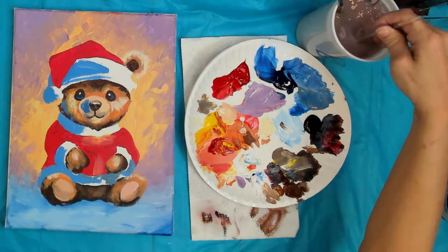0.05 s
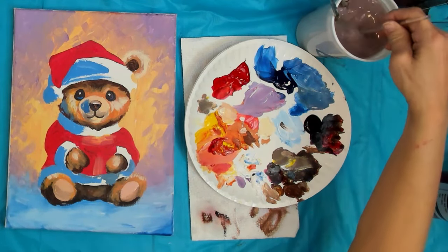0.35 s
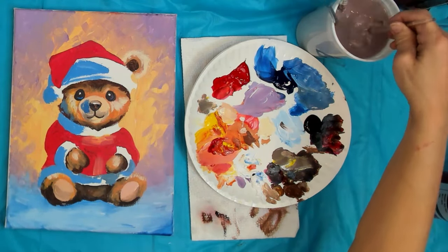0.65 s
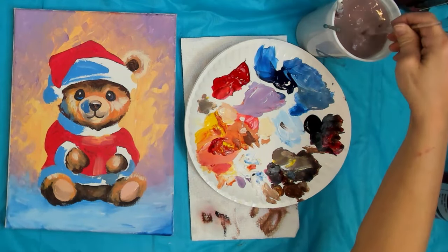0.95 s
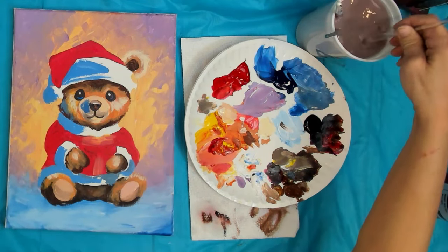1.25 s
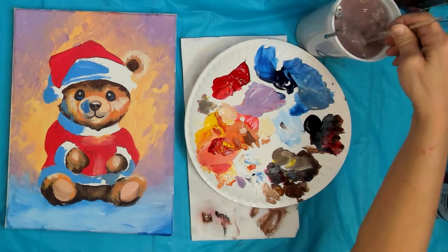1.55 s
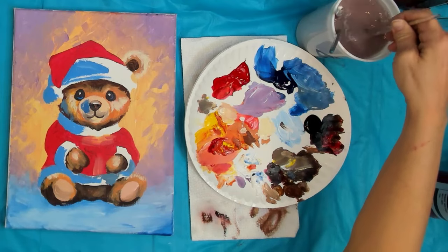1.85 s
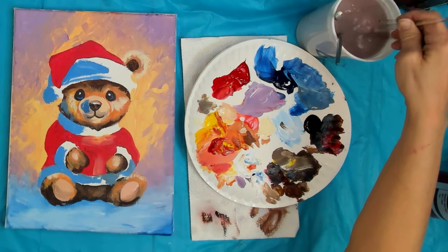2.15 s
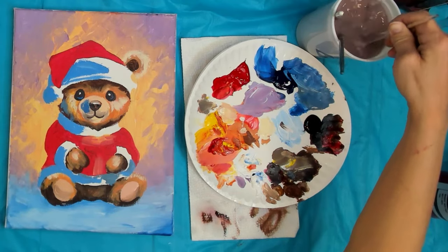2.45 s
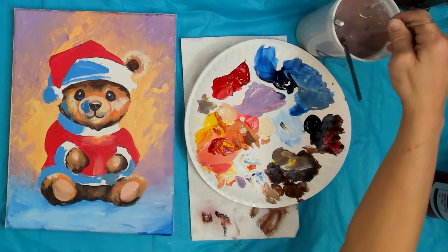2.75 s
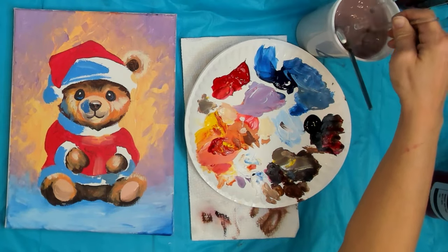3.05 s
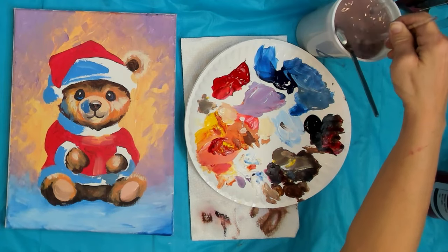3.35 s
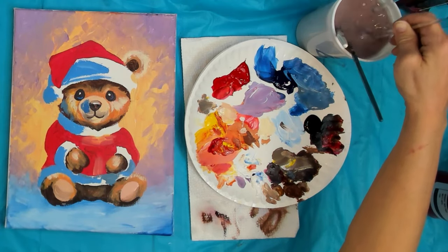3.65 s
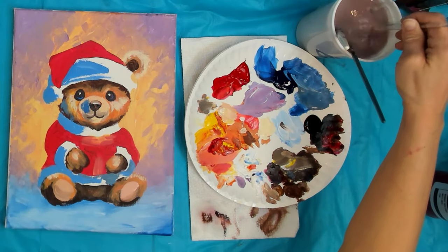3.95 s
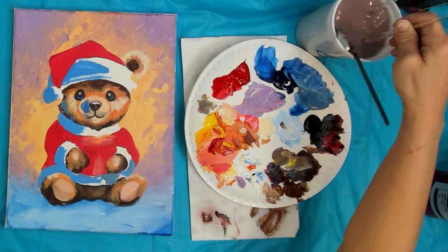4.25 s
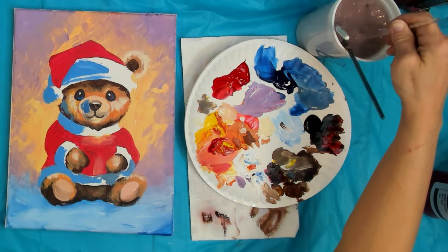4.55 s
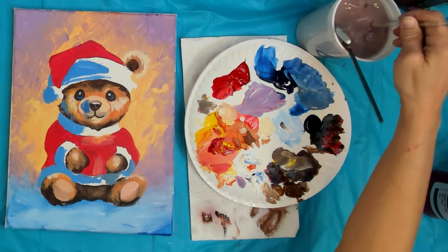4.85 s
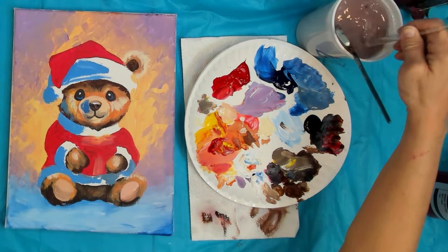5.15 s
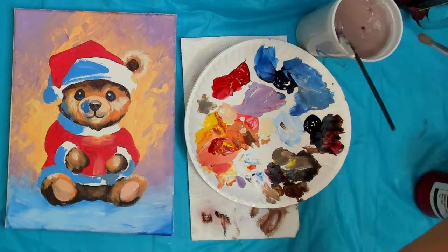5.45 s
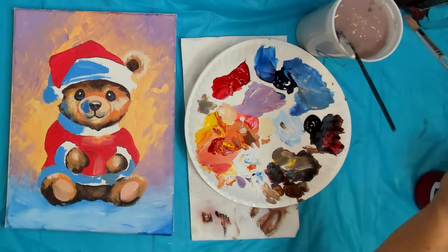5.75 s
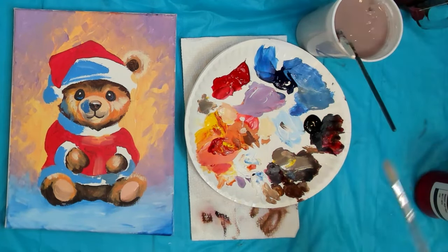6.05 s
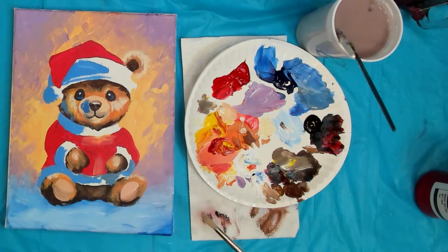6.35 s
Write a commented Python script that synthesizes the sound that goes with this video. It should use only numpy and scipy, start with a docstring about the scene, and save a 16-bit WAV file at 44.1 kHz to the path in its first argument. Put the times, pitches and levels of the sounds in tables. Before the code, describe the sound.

Over a low hum in a small room, water sloshes and fizzes softly as a paintbrush is rinsed in a plastic cup. Sharp little taps and clinks come several times a second, mixed with dull bumps of the cup on the table and one brief glassy ring. Toward the end a few short plops sound, the stirring stops, and a hand makes a quick hissing scuff.

```python
"""Rinsing a paintbrush

A brush is swished in a plastic cup of water on a table in a small room. Its metal band and handle tap and
chatter on the wall, and its bristles push the cup against the table with dull thumps. The water sloshes and
crackles, touches of the brush make the air in the cup plop, and one knock sets a hard object nearby ringing. At
the end the hand brushes past something. Mains hum lies underneath."""
import sys
import numpy as np
from scipy import signal
from scipy.fft import rfft, irfft, next_fast_len
from scipy.io import wavfile
from scipy.ndimage import map_coordinates

SR = 44100
rng = np.random.default_rng(int(sys.argv[2]) if len(sys.argv) > 2 else 0)


def transcribe(u):
    """Save the signal u as a 16-bit wav file named by the first command-line argument.

    u: samples, shape (n,) or (channels, n), limited to [-1, 1]; the rate is SR.
    q: integer samples, one column per channel.
    """
    v = np.clip(np.atleast_2d(u).T, -1, 1)
    q = np.round(v * 32767).astype(np.int16)
    wavfile.write(sys.argv[1], SR, q)


N = 285768

# The brush knocks on the cup wall:
# start_s, level_db, brightness_db_per_octave, mid_boost_db, bounce_after_s, bounce_db
KNOCKS = [(0.0274, -54, -0.5, 4, 0.034, -5.5), (0.062, -63, 0.5, -1, 0.02, -13),
          (0.093, -35, 2.5, -6, 0.013, -5.5), (0.2634, -48, -2.0, 0.5, 0.021, -8),
          (0.4121, -55, -3.5, 4, 0.012, -22), (0.565, -41.5, 0.5, 1.5, 0.014, -12),
          (0.8487, -45.5, -1.5, 7.5, 0.014, -27), (0.9126, -48, 0.5, -0.5, 0.021, -28),
          (0.9871, -50, -1.5, 7.5, 0.012, -31), (1.0771, -45.5, 0.5, 2.5, 0.01, -29),
          (1.154, -49, -1, 6.5, 0.025, -30), (1.2487, -41.5, 1.5, -4.5, 0.011, -24),
          (1.3069, -48.5, 2, 12, 0.0065, -6), (1.3204, -44, -0.1, 4.5, 0.012, -12),
          (1.5669, -42.5, 0.5, 2, 0.0129, -8), (1.7547, -46, -0.1, 0.5, 0.0079, -3),
          (1.851, -51.5, -2, 8.5, 0.01, -19), (1.9358, -39.5, 1, 2.5, 0.0091, -20),
          (2.1199, -43, 3, 3, 0.012, -20), (2.2926, -38, 2, 2.5, 0.0093, -9),
          (2.3928, -57.5, -2.4, 4, 0.018, -4), (2.4835, -40.5, 3, 3.5, 0.0065, -8.5),
          (2.6573, -42.5, 2, 3, 0.0077, -0.5), (2.8382, -49, 0.5, 6.5, 0.021, -12),
          (3.0034, -47, 1, 2.5, 0.012, -0.5), (3.1909, -43.5, 4.5, -2.5, 0.015, -33),
          (3.3813, -46.5, 3.5, 4, 0.0097, -29), (3.456, -57.5, -1, 2.5, 0.0271, -8),
          (3.5631, -45, 5, 2, 0.012, -34), (3.7283, -45.5, 0.7, 2, 0.0076, -10),
          (3.8989, -45, 3, 2, 0.0151, -9), (4.096, -45.5, 1.2, 5, 0.015, -19),
          (4.2493, -51, 1.3, 8.5, 0.011, -5.5), (4.2679, -51, 2.5, -5, 0.011, -27),
          (4.401, -53.5, -1.5, 7, 0.014, 4), (4.417, -57.5, 1.2, 7, 0.011, -2),
          (4.441, -48.5, 0.9, 0, 0.012, -18), (4.4665, -51, 1, 1.5, 0.02, -8.5),
          (4.5878, -53.5, 1.3, 8, 0.012, -26), (4.6111, -50.5, -0.2, 3.5, 0.012, -24),
          (4.7734, -47, 0.6, 3.5, 0.011, -1.5), (4.795, -47.5, 3, -5, 0.012, -34),
          (4.9562, -50, 0.8, 6, 0.0079, -6), (4.9761, -48.5, -0.5, 4.5, 0.01, -3.5),
          (5.2164, -60, -3, 3.5, 0.012, -6)]
# The cup is pushed against the table, then the brush ticks on its wall:
# start_s, level_db, rise_s, tick_after_s, tick_db
PUSHES = [(0.027, -35.5, 0.0034, .03, -63), (0.468, -36, 0.0044, .02, -85),
          (0.66, -45, 0.054, 0.015, -61.5), (0.801, -43.5, 0.015, 0.026, -70),
          (0.852, -36, 0.0025, 0.011, -67), (0.986, -37, 0.0032, 0.022, -77),
          (1.154, -38, 0.0032, 0.019, -75), (1.323, -35, 0.0026, 0.019, -57.5),
          (1.623, -50, 0.053, 0.021, -72), (1.69, -44.5, 0.009, 0.0047, -71.5),
          (1.852, -36, 0.0016, 0.015, -65), (2.027, -45.5, 0.029, 0.0031, -62.5),
          (2.205, -46, 0.0058, 0.02, -62), (2.388, -40.5, 0.0054, 0.021, -71),
          (2.588, -45.5, 0.04, .015, -68), (2.911, -39.5, 0.0098, .0202, -61),
          (3.271, -44, 0.012, 0.014, -62.5), (3.456, -40, 0.0077, 0.029, -59.5),
          (3.988, -39.5, 0.0098, 0.018, -62.5), (4.169, -50, 0.027, .02, -66),
          (4.361, -49.5, 0.014, 0.014, -68.5), (4.846, -53, 0.0049, 0.018, -67),
          (5.588, -49, 0.0016, 0.0018, -64.5)]
# How loud the stirring is: time_s, slosh_db, bristle_db
STIRRING = [(0.0, -46.5, -52), (0.26, -56, -59.5), (0.67, -56, -62.5), (1.19, -59, -66), (1.35, -64, -69),
            (1.53, -60, -59.5), (1.85, -57.5, -66.5), (2.51, -57.5, -64), (2.68, -61.5, -74),
            (2.88, -56, -65.5), (3.02, -66.5, -65), (3.28, -63, -74), (3.45, -57.5, -64), (3.92, -62, -71),
            (4.5, -62, -64), (5.06, -62, -70.5), (5.5, -69.5, -89)]


def amp(db):
    """Turn decibels into a gain."""
    return 10 ** (np.asarray(db) / 20)


def unit(x):
    """Scale a sound to an average (rms) level of 1."""
    return x / np.sqrt(np.mean(x ** 2) + 1e-20)


def fade(t, fade_s):
    """Die away by 60 dB in fade_s."""
    return 1000. ** (-t / fade_s)


def along(points, hz):
    """Read between (pitch_hz, value) points on a log pitch scale."""
    pitches, values = np.transpose(points)
    return np.interp(np.log(hz + 1), np.log(pitches + 1), values)


def curves(rows):
    """One value per sample for each column after the time."""
    times, *columns = np.transpose(rows)
    return [np.interp(np.arange(N) / SR, times, column) for column in columns]


def wobble(rate):
    """A smooth curve through rate random values a second."""
    return map_coordinates(rng.standard_normal(int(N * rate / SR) + 4), [np.arange(N) * rate / SR])


def after(events, lag_s, width_s):
    """A bump between 0 and 1, lag_s after each event, higher for harder ones."""
    times, db = np.transpose(events)[:2, :, None]
    t = np.linspace(0, N / SR, N // 100)
    bumps = np.sum(amp(db) * np.exp(-((t - times - lag_s) / width_s) ** 2), axis=0)
    return np.interp(np.arange(N) / SR, t, np.sqrt(bumps / bumps.max()))


def add(track, start_s, sound):
    """Mix a sound into the track."""
    i = max(0, round(start_s * SR))
    track[i:i + len(sound)] += sound[:len(track) - i]


def band(x, low_hz, high_hz):
    """Keep only the sound between two pitches."""
    return signal.sosfilt(signal.butter(4, [low_hz, high_hz], btype="band", fs=SR, output="sos"), x)


def colour(x, points):
    """Shape a sound's tone with (pitch_hz, gain_db) points."""
    size = 2 * next_fast_len(len(x))
    cepstrum = irfft(np.log(amp(along(points, np.fft.rfftfreq(size, 1 / SR)))))
    # fold the filter so that it never sounds ahead of its input
    cepstrum[1:size // 2] *= 2
    cepstrum[size // 2 + 1:] = 0
    return irfft(rfft(x, size) * np.exp(rfft(cepstrum)))[:len(x)]


def noise(tone):
    """Steady noise with the given tone."""
    return unit(colour(rng.standard_normal(N), tone))


def room(x, echo_db, fade_s, build_s=0.0034):
    """The small room adds a 0.2 s tail of echoes to each row of sound."""
    t = np.arange(SR // 5) / SR
    shape = fade(t, fade_s) * (1 - np.exp(-(t / build_s) ** 2))
    tail = rng.standard_normal(x.shape[:-1] + t.shape) * shape / np.linalg.norm(shape)
    return x + amp(echo_db) * signal.fftconvolve(x, tail, axes=-1)[..., :x.shape[-1]]


def background():
    """Room air, mains hum and the rumble of the table shaking under the arm."""
    # The hum's tones: pitch_hz, level_db
    hum_tones = [(59.2, -68), (118.4, -65), (183.0, -85), (242.2, -76), (360.7, -69.5)]
    # How hard the table shakes: time_s, level_db
    shaking = [(0.0, -74), (0.27, -61), (2.22, -59), (3.14, -63.5), (4.66, -60), (5.05, -68.5), (5.96, -66),
               (6.03, -91), (6.48, -83)]
    # Tone of the room air: pitch_hz, gain_db
    air_tone = [(18, -59), (26, -33), (35, -14), (60, 1), (110, -4.5), (200, -7.5), (330, -8.5),
                (450, -15.5), (1000, -18.5), (3000, -24), (15000, -27.5)]
    t = np.arange(N) / SR
    hum = 0
    for hz, db in hum_tones:
        level = amp(db - 5.5 + 1.2 * wobble(1.73)) * np.sqrt(2)
        hum += level * np.sin(2 * np.pi * (hz * t + rng.random()))
    rumble = noise([(15, -73), (28, -46), (33, -7), (36, -11), (42, -12.5), (70, -18), (200, -58),
                    (1000, -120)])
    return amp(-63.0) * noise(air_tone) + hum + amp(curves(shaking)[0] + 1.5) * rumble


def bubbles(count, hz, spread, cycles, glide, size_db):
    """Bubbles ring at random times, each a fading tone that rises in pitch."""
    when, strength, pick = rng.random((count, 3)).T[:, :, None]
    pitch = hz * np.exp(spread * (2 * pick - 1))
    samples = np.arange(int(2 * cycles / hz * SR))
    turns = pitch * samples / SR
    size = amp(size_db * strength) / np.sqrt(pitch)
    tones = np.sin(2 * np.pi * turns * (1 + glide * turns / cycles))
    rings = size * tones * fade(turns, cycles) * (1 - np.exp(-turns))
    places = (when * N).astype(int) + samples
    return unit(np.bincount(places.ravel(), rings.ravel(), N)[:N])


def water(surge_db=6, lull_db=8, push_db=4, grit_db=5.5):
    """Stirring folds air into the water: gurgles on a soft wash, while wet bristles scrub and fizz."""
    # Tone of the sloshing: pitch_hz, gain_db
    slosh_tone = [(60, -38.5), (100, 6.5), (140, 17.5), (220, -6), (300, 3), (450, 2), (800, -9),
                  (1300, -21), (2500, -17), (6000, -69)]
    # Tone of the scrubbing: pitch_hz, gain_db
    bristle_tone = [(400, -17), (1200, 3), (1600, -10), (3000, 7.5), (4500, -5.5), (7000, -5.5),
                    (11000, -10), (16000, -29)]
    slosh_db, bristle_db = curves(STIRRING)
    wash = amp(3.5 + 0.81 * wobble(22.16)) * noise(slosh_tone)
    gurgle = amp(-6) * bubbles(count=700, hz=558, spread=0.685, cycles=59, glide=0.034, size_db=29)
    slosh = amp(slosh_db - 3.5) * (wash + gurgle)
    grit = rng.standard_normal(N) * amp(grit_db * wobble(260) + 0.62 * wobble(4.97))
    fizz = bubbles(count=1000, hz=2990, spread=0.79, cycles=11, glide=0.022, size_db=20)
    scrub = amp(bristle_db - 5.5) * (unit(colour(grit, bristle_tone)) + amp(-6) * fizz)
    # the brush slows near the wall, then drives the water back; a push on the cup stirs it too
    stroke_db = -lull_db * after(KNOCKS, lag_s=-0.01, width_s=0.011)
    stroke_db += surge_db * after(KNOCKS, lag_s=0.072, width_s=0.042)
    stroke_db += push_db * after(PUSHES, lag_s=0.0083, width_s=0.01)
    settle = np.interp(np.arange(N) / SR, [5.3, 5.8], [1, 0])  # the water calms once the brush is out
    return settle * amp(stroke_db) * room(slosh + scrub, echo_db=-8.0, fade_s=0.092)


def thumps(soft_hz=350, sharp_rise_s=0.004):
    """The cup bounces on the table; a slow push wakes mostly its lowest tones."""
    # Tones of the filled cup on the table: pitch_hz, fade_s, level_db
    cup_tones = [(107.3, 0.23, -12), (138, 0.23, 2), (159.5, 0.14, -12), (207.6, 0.23, -15),
                 (296.1, 0.35, -16), (400, 0.19, -7), (497, 0.056, -1.5), (842, 0.13, -30)]
    out, t = np.zeros(N), np.arange(SR // 2) / SR
    hz, fade_s, db = np.transpose(cup_tones)[:, :, None]
    for start_s, level_db, rise_s, _, _ in PUSHES:
        strength, shift, phase = rng.standard_normal((3, len(cup_tones), 1))
        softness = 1 + (hz / soft_hz) ** 2 * (1 - np.exp(-rise_s / sharp_rise_s)) / 2
        waves = np.sin(2 * np.pi * (hz * (1 + 0.02 * shift) * t + phase))
        tones = amp(db + 2 * strength) / softness * fade(t, fade_s) * waves
        thump = room(tones.sum(axis=0) * (1 - np.exp(-t / rise_s)), echo_db=-17.0, fade_s=0.99)
        add(out, start_s, amp(level_db) * thump / abs(thump).max())
    return amp(3.5) * out


def contacts(tick_gap_s=0.023, stray_count=18, stray_until_s=5):
    """Every touch on the wall: start_s, level_db, brightness_db_per_octave, mid_boost_db."""
    rows = []
    for start_s, db, brightness, mid_db, flight_s, bounce_db in KNOCKS:
        # two slightly brighter bounces; the second comes sooner and weaker
        rows += [(start_s, db, brightness, mid_db),
                 (start_s + flight_s, db + bounce_db, brightness + 0.7, mid_db),
                 (start_s + 1.85 * flight_s, db + bounce_db - 11, brightness + 0.7, mid_db)]
    dull = (-1.5, 2.5)  # brightness and mid boost of every tick
    for (start_s, _, _, delay_s, db), late in zip(PUSHES, rng.uniform(-1.1, 1, len(PUSHES))):
        tick_s = start_s + delay_s
        rows += [(tick_s, db, *dull), (tick_s + tick_gap_s * (1 + .15 * late), db - 2.5, *dull)]
    # chance touches follow the loudness of the scrubbing
    times, _, bristle_db = np.transpose(STIRRING)
    for when, weak in rng.random((stray_count, 2)):
        tick_s = stray_until_s * when
        rows.append((tick_s, np.interp(tick_s, times, bristle_db) - 5 * weak, *dull))
    return np.array(rows)


def taps(scatter_db=5.0, detune=0.016, mid_hz=2320, mid_octaves=1.09):
    """Each touch makes the wall crack and ring; hard metal hits are bright, cushioned ones dull."""
    # Tones of the cup wall: pitch_hz, width_hz (wider dies sooner), level_db
    wall_tones = [(418, 23, -3), (503, 71, -4.5), (580, 110, -15), (828, 33, -14), (984.4, 23, -6),
                  (1073, 66, -3), (1193, 73, -1.5), (1644, 71, -8), (2094, 123, 6.5), (2430, 84, 9.5),
                  (2720, 190, 2), (3324, 63, 8.5), (4330, 220, 1), (4492, 128, 8.5), (5610, 64, 3),
                  (5300, 260, -4), (6030, 42, -2.5), (6966, 70, -3), (7030, 130, -26), (8400, 140, -7),
                  (8930, 160, -14), (9210, 130, -11.5), (10060, 107, -5.5), (11500, 360, -8),
                  (12140, 58, -9.5)]
    # Borders of five pitch bands, low to high: pitch_hz
    edges = [300, 800, 1700, 3800, 7500, 15500]
    # How the wall answers in each band: swell_s, crack_fade_s, crack_db, echo_db, trim_db
    wall_bands = [(0.0031, 0.077, -3.5, -2.5, 1), (0.0038, 0.052, -8.5, -5.5, -1),
                  (0.00095, 0.037, 1.5, -12.5, -0.5), (0.000067, 0.027, -5.5, -12.5, 1.5),
                  (0.000066, 0.0064, -3.5, -18.5, -1)]
    # How fast the room's echo dies: pitch_hz, fade_s
    echo_fades = [(150, 0.34), (800, 0.17), (2500, 0.19), (7000, 0.16), (14000, 0.21)]
    # How well the cup passes sound to the air: pitch_hz, gain_db
    cup_to_air = [(300, -1), (400, -1), (700, 0), (1000, -1), (1250, 0), (1450, -1), (1750, -3), (2000, -1),
                  (9000, 1), (11000, 0.5), (13000, -5), (16000, -8)]
    out, t = np.zeros(N), np.arange(SR // 7) / SR
    times, strength_db, brightness, mid_db = contacts().T
    hz, width, db = np.transpose(wall_tones)[:, :, None]
    decay = width * np.exp(-np.pi * width * t)
    rings = []
    for strength, shift, phase in rng.standard_normal((len(times), 3, len(wall_tones), 1)):
        # moving water loads the wall, so its tones shift a little from tap to tap
        waves = np.sin(2 * np.pi * (hz * (1 + detune * shift) * t + phase))
        rings.append(unit(np.sum(amp(db + scatter_db * strength) * decay * waves, axis=0)))
    blows = 0
    for low, high, (swell_s, fade_s, crack_db, echo_db, trim_db) in zip(edges, edges[1:], wall_bands):
        centre_hz = np.sqrt(low * high)
        octaves = np.log2(centre_hz / mid_hz)
        level_db = strength_db + brightness * octaves + mid_db * np.exp(-(octaves / mid_octaves) ** 2)
        ring = unit(band(np.array(rings), low, high))
        crack = unit(band(rng.standard_normal(ring.shape) * fade(t, fade_s), low, high))
        # slow bending waves take a few milliseconds to set the whole wall moving
        blow = (ring + amp(crack_db) * crack) * (1 - np.exp(-(t / swell_s) ** 2))
        blow = room(blow, echo_db, along(echo_fades, centre_hz))
        opening_level = np.sqrt(np.mean(blow[:, t < .012] ** 2, axis=1))
        blows += blow * (amp(level_db + trim_db) / opening_level)[:, None]
    for start_s, blow in zip(times, blows):
        add(out, start_s, blow)
    return colour(out, cup_to_air)


def clinks():
    """Struck near its free end, the brush handle bends and rings with three close tones."""
    # Hits on the handle: start_s, level_db
    hits = [(1.249, -28.5), (2.2925, -30), (4.416, -31)]
    # The handle's tones: pitch_hz, level_db, fade_s
    handle_tones = [(2150, -1, 0.036), (2310, -4, 0.052), (2470, 7, 0.014)]
    out, t = np.zeros(N), np.arange(SR // 4) / SR
    for start_s, level_db in hits:
        ring = sum(amp(db) * fade(t, fade_s) * np.sin(2 * np.pi * (hz * t + rng.random()))
                   for hz, db, fade_s in handle_tones)
        add(out, start_s, amp(level_db) * ring / abs(ring).max())
    return room(out, echo_db=-7, fade_s=0.23)


def chime(start_s=1.322, level_db=-40):
    """A hard knock sets glass or metal beside the cup ringing."""
    # The object's tones: pitch_hz, level_db, fade_s
    object_tones = [(928, -7.5, 0.21), (1305, 0, 0.68), (2160, -13, .36), (2400, -18, .15),
                    (3000, -3, 0.15)]
    out, t = np.zeros(N), np.arange(SR) / SR
    for hz, db, fade_s in object_tones:
        add(out, start_s, amp(level_db + db) * fade(t, fade_s) * np.sin(2 * np.pi * hz * t))
    return out


def plops(pitch_hz=1225, fade_s=0.045, rise_s=0.0032):
    """Touches of the brush set the air in the cup ringing with a short, hollow note."""
    # The plops: start_s, level_db
    notes = [(3.906, -40), (4.252, -38.5), (4.616, -40.5), (4.666, -47), (4.778, -37), (4.983, -38),
             (5.042, -54.5), (5.218, -45.5), (5.321, -61)]
    out, t = np.zeros(N), np.arange(SR // 6) / SR
    shape = fade(t, fade_s) * (1 - np.exp(-(t / rise_s) ** 2))
    for (start_s, level_db), phase in zip(notes, rng.random(len(notes))):
        tone = np.sin(2 * np.pi * (pitch_hz * t + phase))
        add(out, start_s, amp(level_db) * shape / shape.max() * tone)
    return room(out, echo_db=-15, fade_s=0.14)


def scuffs():
    """The hand brushes past something beside the cup: short hisses with no ring."""
    # The hand's touches: start_s, level_db, fade_s
    touches = [(5.554, -62, .02), (5.586, -40.5, 0.032), (5.5899, -40.5, 0.04), (5.603, -46.5, 0.02),
               (5.642, -47.5, 0.022), (5.654, -51.5, 0.15), (5.705, -58, 0.033), (5.773, -49.5, 0.033)]
    # Tone of the hiss: pitch_hz, gain_db
    hiss_tone = [(300, 6.5), (1500, -10), (3500, -3), (5200, -1.5), (7000, -2.5), (10000, -4.5),
                 (14500, -9), (16000, -11)]
    loudness, t = np.zeros(N), np.arange(SR // 8) / SR
    for start_s, db, fade_s in touches:
        add(loudness, start_s, amp(db) * fade(t, fade_s))
    return room(loudness * noise(hiss_tone), echo_db=-13, fade_s=0.11)


def scene():
    """Mix all the sounds into one channel."""
    return (taps() + clinks() + thumps() + water() + plops() + chime() + scuffs() + background())[None]


def record(dry):
    """Cut away the very highest treble."""
    top_hz = 16200
    size = next_fast_len(N + SR // 2)
    return irfft(rfft(dry, size) * (np.fft.rfftfreq(size, 1 / SR) < top_hz), size)[:, :N]


dry = scene()
out = record(dry)
transcribe(out)
```